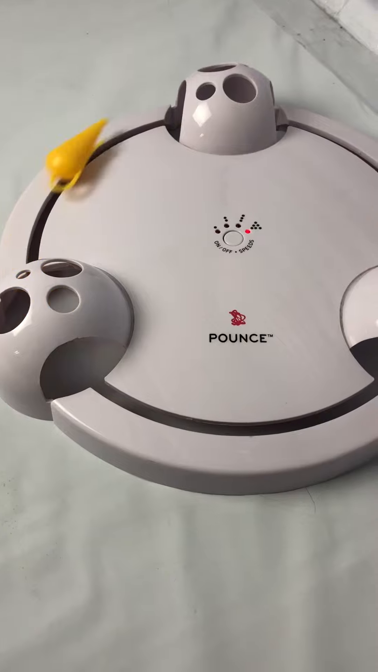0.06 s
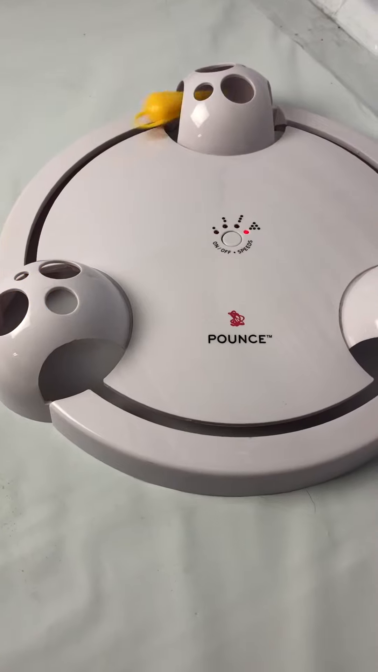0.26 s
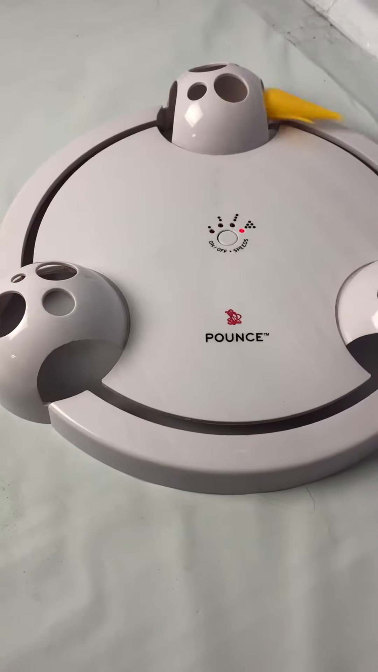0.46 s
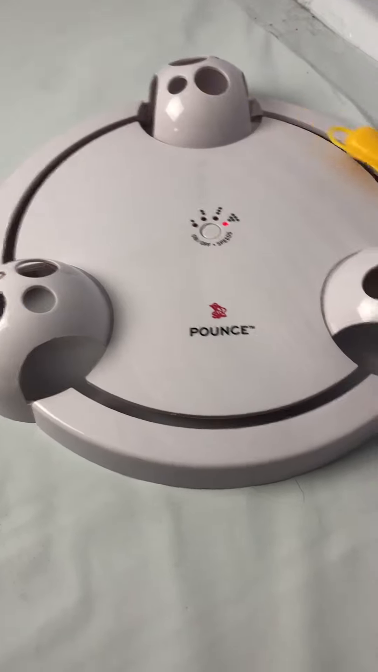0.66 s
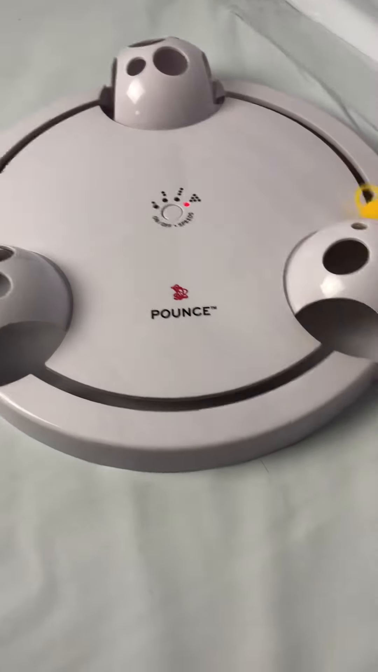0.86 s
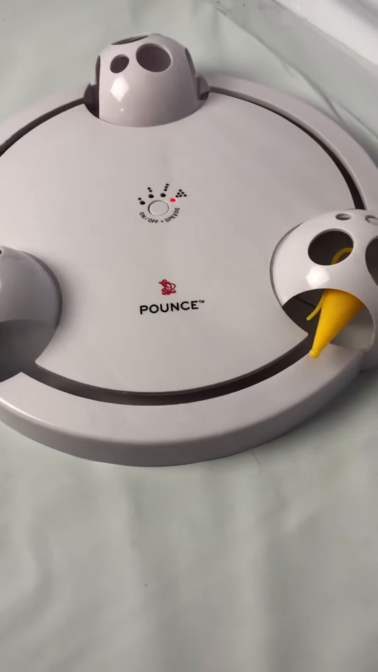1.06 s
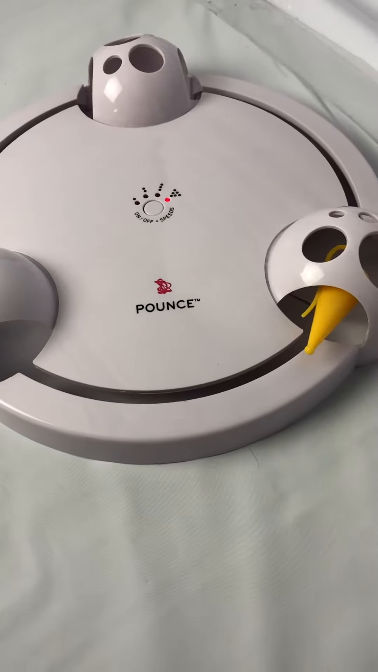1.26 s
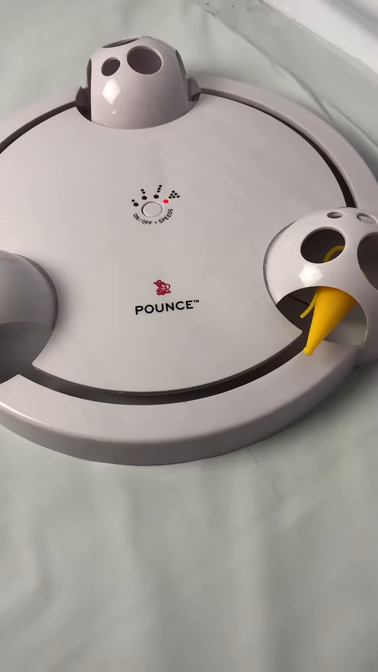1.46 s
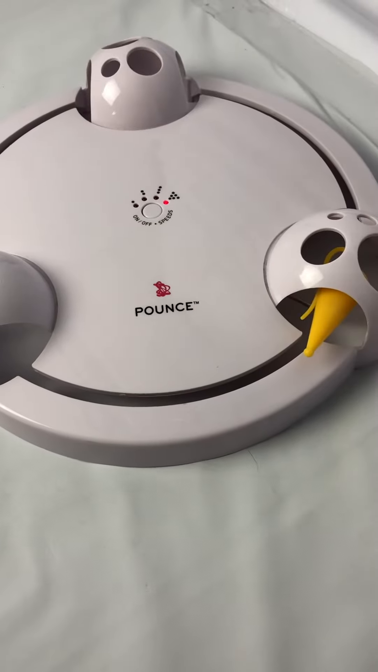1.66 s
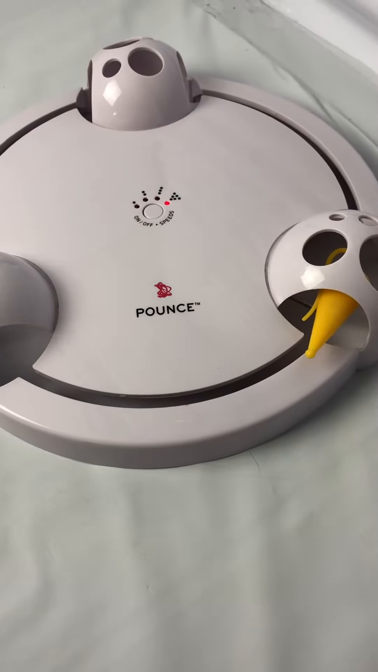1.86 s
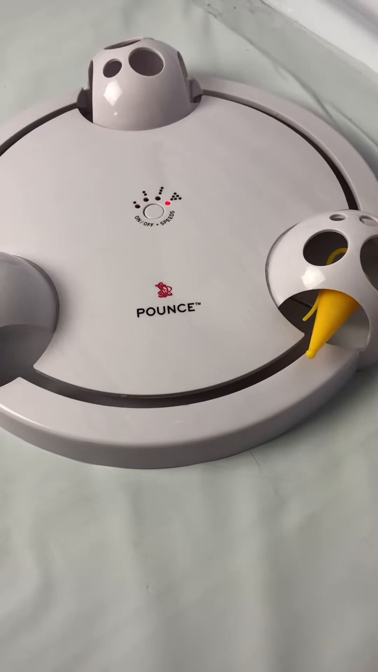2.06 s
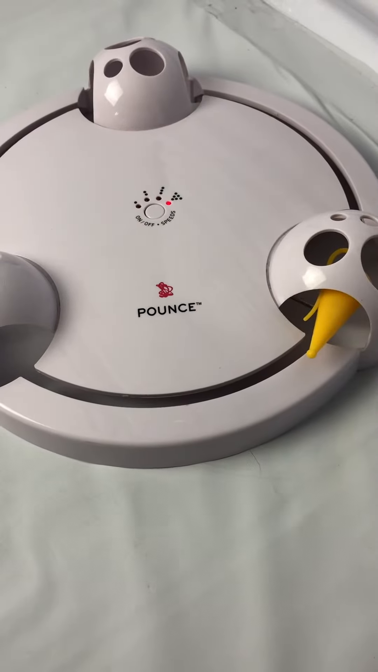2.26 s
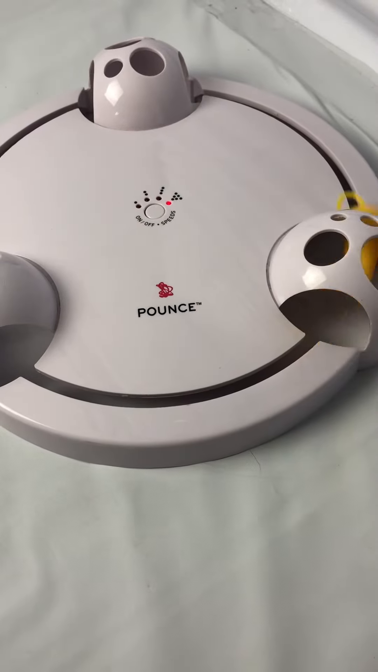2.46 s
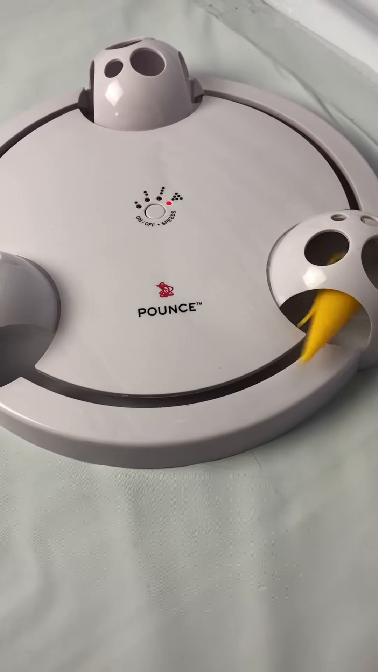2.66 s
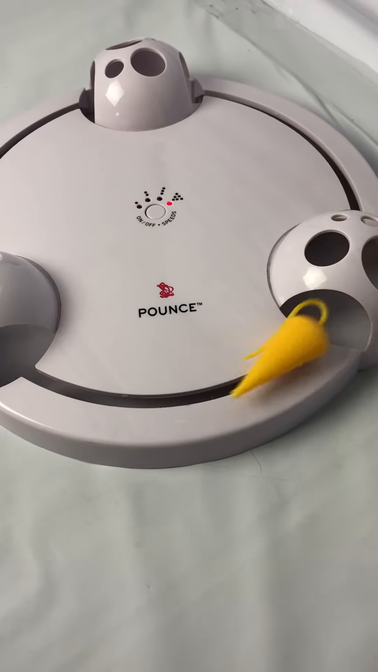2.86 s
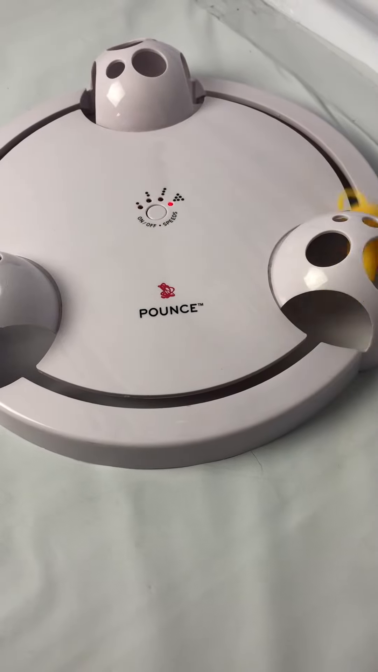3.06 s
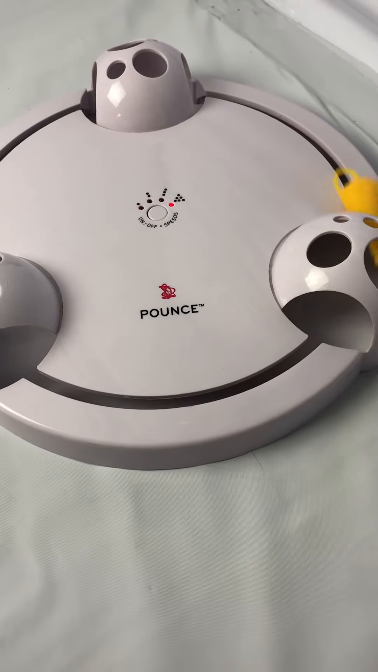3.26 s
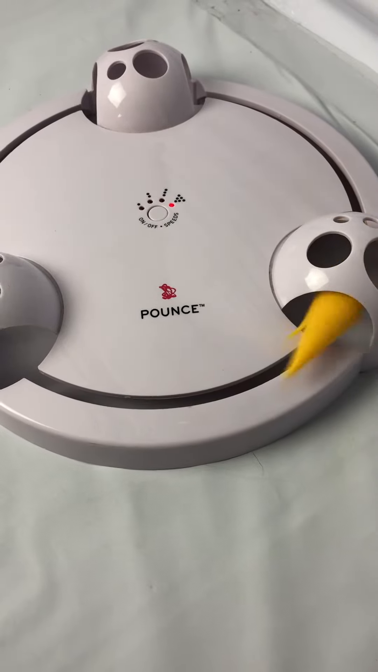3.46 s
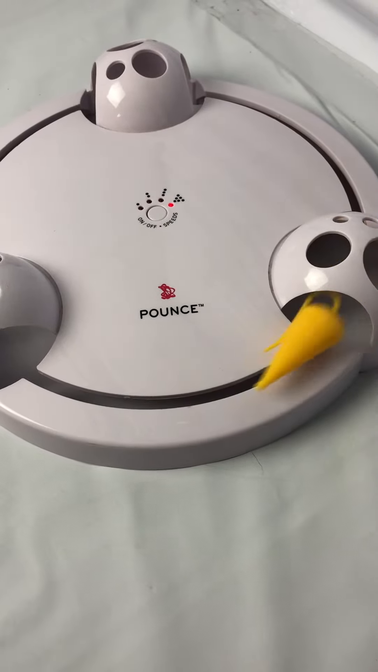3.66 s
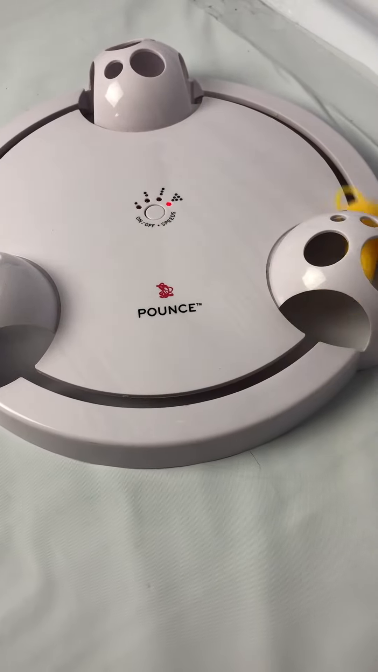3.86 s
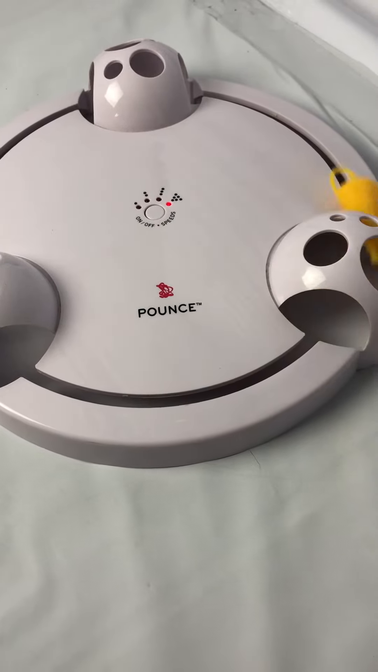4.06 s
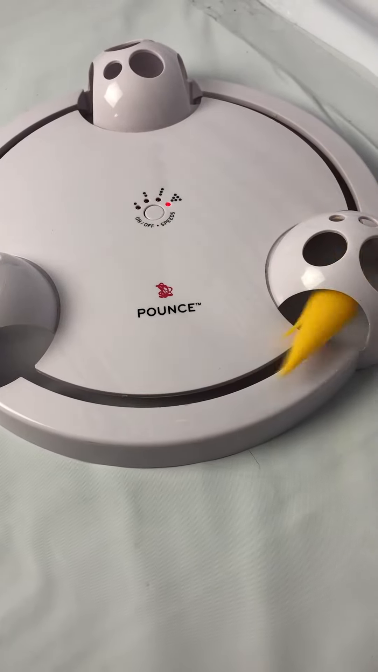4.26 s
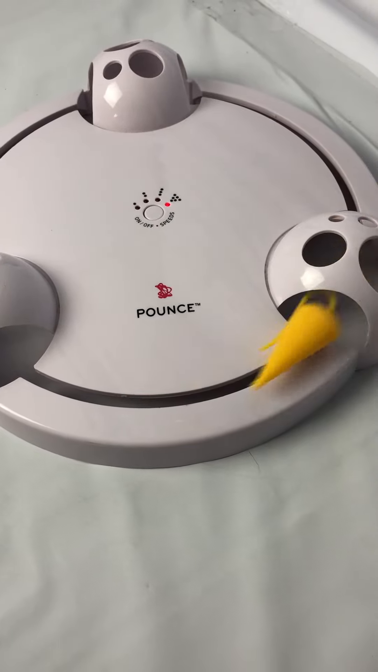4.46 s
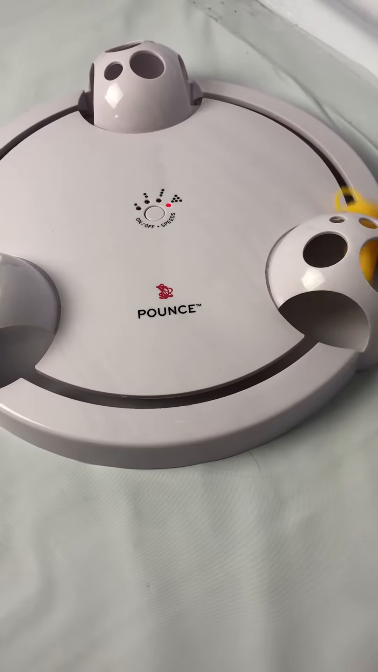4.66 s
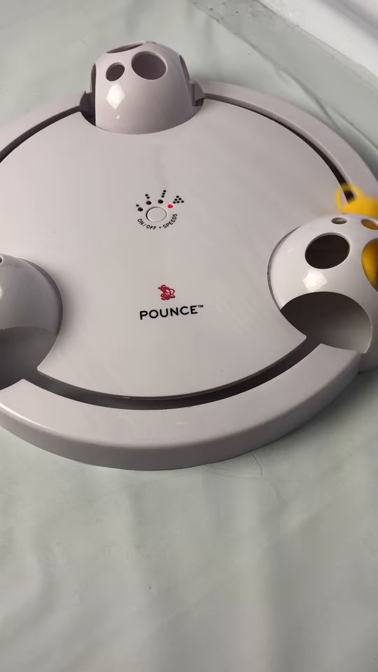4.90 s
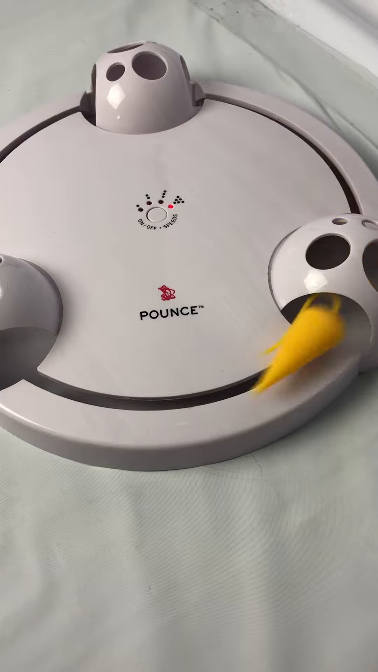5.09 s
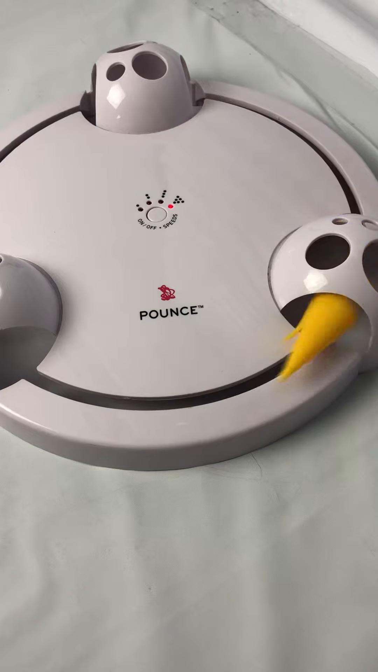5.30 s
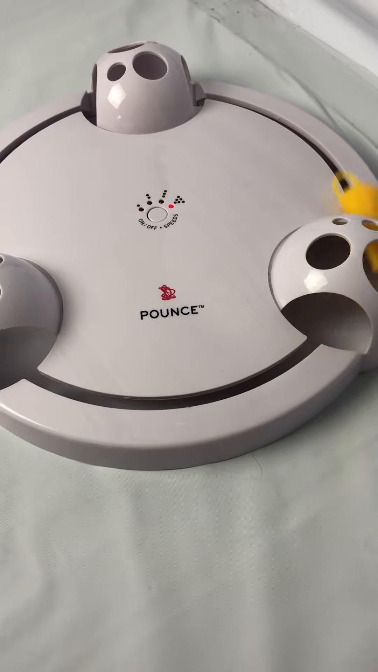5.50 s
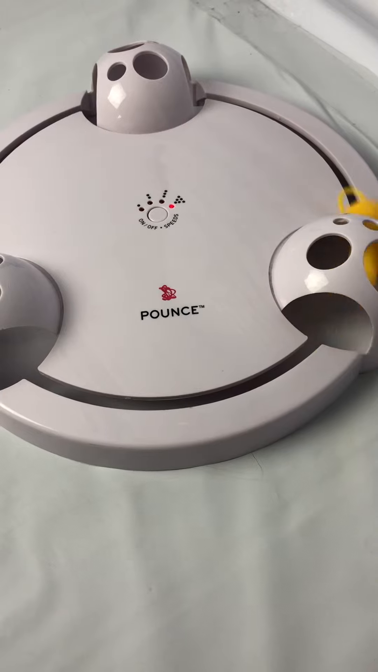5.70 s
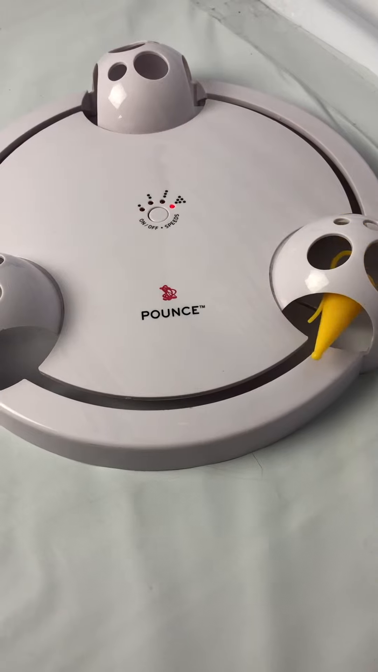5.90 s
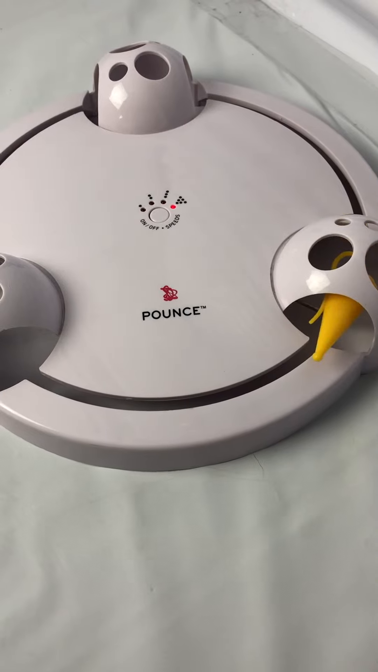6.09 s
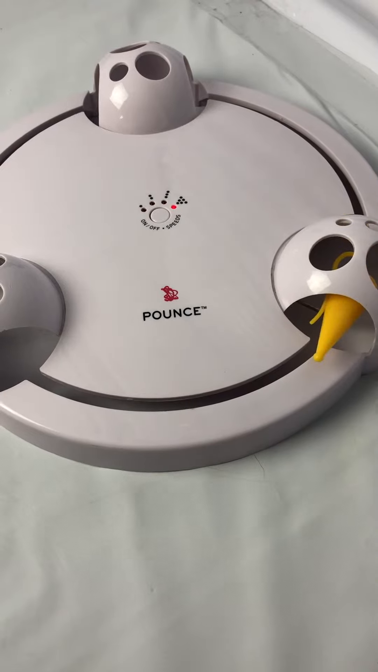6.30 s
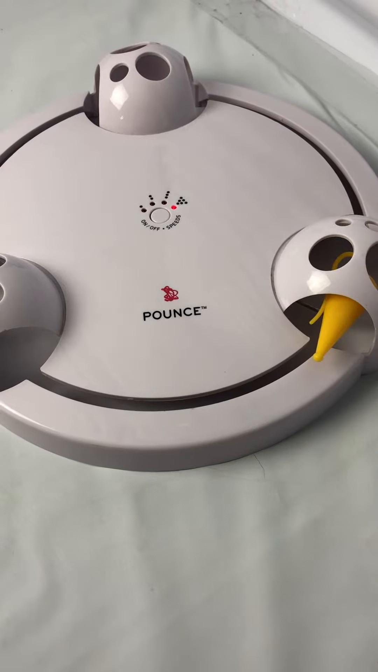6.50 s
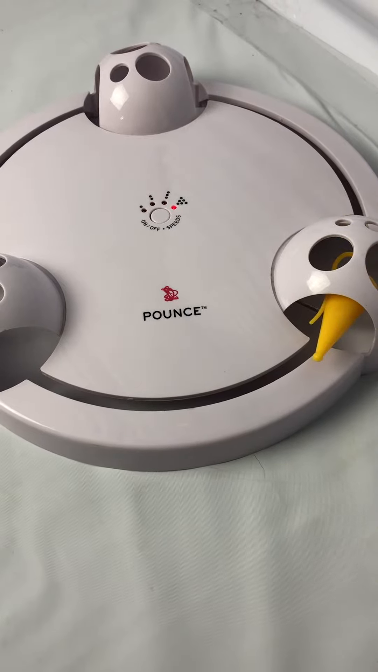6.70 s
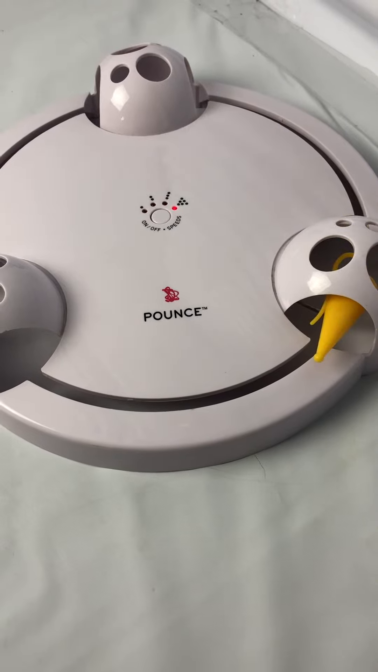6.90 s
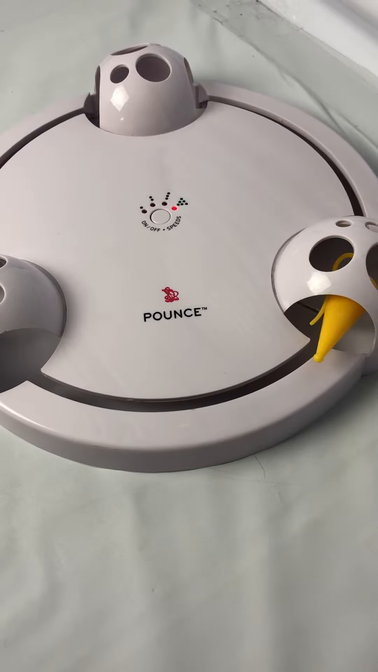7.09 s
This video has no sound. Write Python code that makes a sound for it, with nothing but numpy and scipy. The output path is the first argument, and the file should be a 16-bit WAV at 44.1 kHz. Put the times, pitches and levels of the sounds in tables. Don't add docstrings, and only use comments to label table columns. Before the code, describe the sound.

Close up in a small quiet room, a motorised cat toy whirs as its carriage rubs along a hollow plastic slot. One sweep lasts about a second, with a rattly bump midway, and stops with a clack. After a pause of just over a second it swings to and fro, knocking and rebounding at every reversal, then stops abruptly, leaving faint hum and hiss.

```python
import sys
import numpy as np
from scipy import signal
from scipy.fft import rfft, irfft, next_fast_len
from scipy.io import wavfile

SR = 44100
rng = np.random.default_rng(int(sys.argv[2]) if len(sys.argv) > 2 else 0)


def boost(x):
    u = np.asarray(x, float) / 20
    return 10 ** u


def output_pcm(signal):
    pcm = np.clip(np.atleast_2d(signal).T, -1, 1) * 32767
    wavfile.write(sys.argv[1], SR, np.round(pcm).astype(np.int16))


N = 314918

# switch-on in seconds, switch-off in seconds.
MOTOR_RUNS = [
    (-0.2, 1.096),
    (2.377, 5.9),
]
# time after the turn in seconds, level in dB.
SWING_LOAD = [
    [(0, 5), (0.12, 1), (0.25, 0), (0.4, 1)],
    [(0, 2.5), (0.13, 4), (0.23, -3.5), (0.4, 0)],
]
# stop in seconds, peak level in dB,
# rebound delay in seconds, rebound level in dB, lead of the brake tick in seconds.
TURNS = [(1.0653, -26.5, 0.02, -26.5, .0507), (2.4906, -27.5, .0249, -28.5, 0.049),
         (2.7082, -24, 0.028, -24, 0.052), (3.0966, -26.5, 0.024, -29.5, 0.055),
         (3.488, -26.5, 0.03, -22.5, .0467), (3.8885, -24, 0.023, -28, 0.048),
         (4.2904, -27, 0.023, -24, 0.05), (4.69, -25.5, .0228, -28.5, 0.041),
         (5.0878, -24.5, 0.025, -28, 0.043), (5.4869, -26, 0.024, -27, 0.038),
         (5.8826, -26.5, 0.025, -27, .0509)]
# frequency in Hz, width in Hz, level in dB.
RUBBED_SHELL = [(516, 85, -12.5), (647.7, 91, -4), (705.3, 53.3, 1), (850, 117, -7.5), (948, 58, -1),
                (1038, 58, -0.5), (1175, 180, -7), (1364, 217, -7), (1500, 114, -4.5), (1726, 223, -7),
                (1793, 680, -13), (2340, 85, -15.5)]
# frequency in Hz, width in Hz, level in dB.
MOTOR_PARTS = [(6070, 120, -7), (6320, 180, 1.5), (6850, 160, 0.5), (7400, 220, -3.5), (8280, 180, -4),
               (10260, 130, -12), (11500, 200, -12), (12340, 430, -15.5), (14500, 2600, -20.5)]
# frequency in Hz, width in Hz, level in dB.
BASE = [(60, 38, -9.5), (118.3, 10.5, -0.5), (158.9, 15, 0.5), (222.7, 17.4, -4.5), (282, 30.5, -3.5)]
# frequency in Hz, width in Hz, level in dB.
LOOSE_PARTS = [(2600, 400, -4), (2870, 120, -0.5), (3213, 150, 1.5), (3500, 130, -4.5), (3960, 160, -3.5),
               (4620, 220, -6.5), (5100, 420, -7)]
# frequency in Hz, level in dB.
HISS_COLOUR = [(20, -20), (45, -5), (110, -2), (250, -6), (500, -12.5), (1000, -18.5), (2000, -24.5),
               (5000, -27.5), (10000, -30), (16000, -36)]
# frequency in Hz, rms level in dB.
HUM = [(60, -82.5), (120, -73.5), (178, -118), (1081, -100), (1801, -93)]
# frequency in Hz, width in Hz, level in dB.
STRUCK_SHELL = [(530, 24, -8.5), (638, 52, -6.5), (719.7, 33.7, -1), (881, 120, -6.5), (1016, 64, 1),
                (1100, 87, -1.5), (1210, 212, 0), (1373, 183, -0.5), (1480, 121, -1), (1674, 149, 0.5),
                (1740, 245, -5), (2266, 180, -10.5)]
# frequency in Hz, width in Hz, level in dB.
LURE = [(2824, 190, 1.5), (3300, 90, 1.5), (3590, 160, -0.5), (4000, 122, 2), (4360, 190, -2),
        (4770, 96, 3), (5180, 250, -1.5), (5915, 370, -1.5), (6580, 540, -5), (7670, 590, -5),
        (8530, 770, -9), (10460, 1100, -15), (12210, 910, -15), (14850, 1700, -20)]
# start in seconds, bright level in dB, shell level in dB, chatter in seconds.
SLACK_KNOCKS = [(.0134, -39.5, -39, 0.01), (0.0874, -46, -35.5, 0.0082), (0.2768, -40, -34.5, .006),
                (.287, -38.5, -36, 0.0059), (0.369, -38.5, -36.5, 0.0053), (0.379, -37.5, -35.5, 0.0049),
                (.416, -33.5, -51, 0.0099), (.4277, -35.5, -36.5, .007), (.445, -38, -39, 0.016),
                (.4762, -27, -30, .018), (0.5225, -31, -30, 0.0086), (.7751, -46, -41, 0.0069),
                (1.046, -35, -31.5, 0.015), (1.0974, -33.5, -33.5, 0.01), (1.1332, -43.5, -36.5, 0.011),
                (1.1868, -55, -43, 0.0046), (2.3847, -47, -60, 0.022), (2.4559, -35.5, -33.5, 0.024),
                (5.8925, -26.5, -42, 0.014), (5.9541, -38, -33, 0.0066), (6.0096, -55, -44, 0.0069),
                (2.659, -42, -34.5, 0.02), (2.6927, -33.5, -31.5, 0.0095), (2.784, -40, -34, 0.0055),
                (2.836, -30.5, -31.5, 0.0068), (2.8913, -42, -41, .007), (2.9487, -40, -39.5, 0.032),
                (3.0606, -36, -41, 0.013), (3.1852, -42.5, -34.5, .007), (3.2307, -37, -40, .004),
                (3.3003, -32.5, -33.5, 0.0091), (3.343, -42, -37.5, 0.0099), (3.5072, -29.5, -32.5, 0.012),
                (3.5317, -40, -41, 0.011), (3.5568, -47, -40, 0.0054), (3.5776, -45, -43, .012),
                (3.8423, -35.5, -48, 0.027), (3.9366, -33, -33, 0.0048), (3.9647, -36, -35, 0.0098),
                (4.0676, -33, -32, 0.0094), (4.2752, -38, -36, 0.014), (4.369, -44, -35.5, 0.013),
                (4.501, -36, -34.5, 0.028), (4.867, -29.5, -32.5, 0.0088), (4.9018, -42, -41, 0.0042),
                (5.1694, -38, -34.5, 0.0051), (5.4004, -40.5, -37.5, 0.01), (5.6288, -37.5, -32, 0.0086),
                (5.663, -32, -30, 0.025), (5.7663, -41, -38, .013), (5.7773, -45, -38, 0.0087)]
# start in seconds, level in dB, favoured
# pitch in Hz.
LURE_TICKS = [(.0998, -42, 2870), (2.543, -32.5, 2900), (2.593, -31.5, 2720), (2.628, -40.5, 2840),
              (3.0126, -41.5, 3590), (3.054, -48, 5090), (3.267, -46, 3330), (3.3937, -37.5, 2850),
              (3.694, -38, 2890), (3.7637, -43, 5430), (3.7763, -43, 2860), (3.8214, -44, 2930),
              (4.103, -39.5, 2890), (4.132, -43, 2640), (4.169, -38, 2710), (4.31, -27.5, 4500),
              (4.4186, -36, 3300), (4.563, -48, 5360), (4.767, -39, 3210), (4.837, -50, 3060),
              (4.934, -39, 2830), (5.1295, -35.5, 4770), (5.2742, -41, 2500), (5.293, -43, 2860),
              (5.361, -44, 5330), (5.3762, -42, 2850), (5.5633, -36.5, 3300), (5.731, -48, 3190)]
# start in seconds, peak level in dB, favoured pitch in Hz, chatter in seconds.
SHELL_BUMPS = [(.015, -20.5, 1010, 0.0065), (.162, -23.5, 990, 0.007), (.279, -20, 950, 0.024),
               (.467, -12, 1430, 0.0079), (.491, -12, 960, 0.014), (.504, -17.5, 1500, 0.0061),
               (1.159, -42, 646, .008), (1.19, -41, 1000, .015), (2.387, -19.5, 640, .006),
               (2.545, -17, 1480, 0.012), (2.564, -22, 1460, 0.015), (2.823, -21, 1600, 0.0092),
               (3.06, -19, 1250, 0.0085), (3.855, -22, 1100, 0.03), (4.007, -17, 1630, 0.0075),
               (4.062, -34, 1330, 0.013), (4.4772, -18, 1020, 0.0052), (4.3182, -12, 1220, 0.0031),
               (4.505, -31, 1210, .01), (4.803, -23.5, 1090, 0.0081), (5.061, -30, 1160, .008),
               (5.2, -17, 980, 0.012), (5.254, -25, 988, .006), (5.453, -15, 785, 0.016),
               (5.544, -31, 686, .011), (5.662, -33, 1330, .006), (5.892, -10.5, 1140, 0.009),
               (6.045, -43, 1006, 0.013)]


def rms_one(x):
    return x / np.sqrt(np.mean(x ** 2) + 1e-20)


def drift(rate_hz):
    r = np.exp(-80 * np.pi * rate_hz / SR)
    steps = rng.standard_normal(N // 40 + 2002)
    slow = signal.lfilter([1], [1, -2 * r, r * r], steps)[2000:]
    return np.interp(np.arange(N) / 40, np.arange(len(slow)), rms_one(slow))


def resonate(x, hz, width_hz):
    r = np.exp(-np.pi * width_hz / SR)
    feed = np.array([1, 0, -1]) * (1 - r * r) / 2
    return signal.lfilter(feed, [1, -2 * r * np.cos(2 * np.pi * hz / SR), r * r], x + 1e-18)


def grains(shape, per_s, spread_db):
    sizes = boost(spread_db * np.minimum(rng.exponential(1, shape), 4)) * rng.choice([-1, 1], shape)
    return sizes * (rng.random(shape) < per_s / SR)


def rub(modes, level_db, per_s, spread_db, lumpy_db):
    wander_db = 1.0
    drag = grains(N, per_s, spread_db) * boost(lumpy_db * drift(40))
    body = np.zeros(N)
    for k, (hz, width_hz, db) in enumerate(modes):
        gain = boost(db + wander_db * drift(7.3))
        body += (-1) ** k * gain * resonate(drag, hz, width_hz)
    return boost(level_db) * rms_one(body)


def motor_run(coast_db_per_s):
    spin_up_s, spin_up_db = 0.094, -13
    t = np.arange(N) / SR
    runs = []
    for on, off in MOTOR_RUNS:
        spin_up = spin_up_db * np.clip(1 - (t - on) / spin_up_s, 0, 1)
        coast = coast_db_per_s * np.maximum(t - off, 0)
        runs.append(np.where(t < on, -150, spin_up + coast))
    return np.maximum(*runs)


def swing():
    t, turn_s = np.arange(N) / SR, np.array(TURNS)[:, 0]
    last = np.searchsorted(turn_s, t) - 1
    since = t - turn_s[last]
    sweeping = last < 1
    load = np.where(last % 2, *[np.interp(since, *np.transpose(rows)) for rows in SWING_LOAD])
    speed = np.interp(since, [0, 0.12, 0.62], [8.5, -5, 8.5])
    pass_s, pass_width_s, pass_db = 0.46, 0.11, 6
    hood = pass_db * np.exp(-((t - pass_s) / pass_width_s) ** 2)
    return np.where(sweeping, hood, load), np.where(sweeping, 0, speed)


def whirr():
    load, speed = swing()
    shell_db = -49.5 + motor_run(-190) + load
    parts_db = -68.5 + motor_run(-300) + speed
    base_db = -57.5 + motor_run(-85) + 0.53 * load
    rattle_db = shell_db - 13.5 + 3 * (np.arange(N) > TURNS[1][0] * SR)
    shell = rub(RUBBED_SHELL, shell_db + 3.0, per_s=2500, spread_db=2.0, lumpy_db=0.07)
    parts = rub(MOTOR_PARTS, parts_db + 2.5, per_s=7200, spread_db=1.0, lumpy_db=-2.8)
    base = rub(BASE, base_db - 0.5, per_s=600, spread_db=6.0, lumpy_db=-1.0)
    rattle = rub(LOOSE_PARTS, rattle_db, per_s=900, spread_db=3.5, lumpy_db=2.5)
    return shell + parts + base + rattle


def room():
    size = next_fast_len(N)
    hz = np.maximum(np.arange(size // 2 + 1) * SR / size, 1)
    colour_hz, colour_db = np.transpose(HISS_COLOUR)
    colour = boost(np.interp(np.log(hz), np.log(colour_hz), colour_db))
    hiss = irfft(rfft(rng.standard_normal(size)) * colour, size)[:N]
    t = np.arange(N) / SR
    hum = np.zeros(N)
    for f, db in HUM:
        hum += boost(db + 1.5 * drift(3)) * np.sqrt(2) * np.sin(2 * np.pi * f * t)
    whine_hz, whine_width_hz = 8620, 260
    whine = resonate(rng.standard_normal(N), whine_hz, whine_width_hz)
    whine = resonate(whine, whine_hz, whine_width_hz)
    return boost(-68.5) * rms_one(hiss) + hum + boost(-89.5) * rms_one(whine)


def walls(x):
    t60_s, level_db = 0.12, -16.5
    age = np.arange(SR // 3) / SR
    tail = rng.standard_normal(len(age)) * boost(-60 * age / t60_s) * (age > .004)
    tail = signal.lfilter([1], [1, -.5], tail)
    return boost(level_db) * signal.fftconvolve(x, tail / np.sqrt(np.sum(tail ** 2)))[:N]


def strike(modes, at_s, level_db, chatter_s, first, favoured_hz=None, focus_db=None, per_s=1400):
    age = np.arange(2048)
    chatter = grains((len(at_s), len(age)), per_s, 3.86) * .5
    chatter[:, 0] = first * np.minimum(0.01 / chatter_s, 1)
    chatter *= np.exp(-age / (np.clip(chatter_s, .001, .02)[:, None] * SR))
    chatter *= (boost(level_db) / np.sqrt(np.sum(chatter ** 2, axis=1)))[:, None]
    where = (np.round(at_s * SR).astype(int)[:, None] + age).ravel()
    scatter_db = 3.0
    share = boost(scatter_db * np.clip(rng.standard_normal((len(at_s), len(modes))), -1.5, 1.5))
    if favoured_hz is not None:
        octaves_off = np.abs(np.log2(np.array(modes)[:, 0] / favoured_hz[:, None]))
        share *= boost(-focus_db[:, None] * octaves_off)
    out = np.zeros(N)
    for k, (hz, width_hz, db) in enumerate(modes):
        force = np.bincount(where, (chatter * share[:, k:k + 1]).ravel(), N)
        out += (-1) ** k * boost(db) * resonate(force, hz, width_hz)
    return out


def contacts():
    crisp_s = .008
    rows = [(s, bright, shell, 3250, chatter) for s, bright, shell, chatter in SLACK_KNOCKS]
    rows += [(s, db, db - 9, hz, 0.0094) for s, db, hz in LURE_TICKS]
    for k, (s, db, gap, rebound_db, lead) in enumerate(TURNS):
        inward = k % 2
        brake = (-34.5, -46.5, 1600) if inward else (-31, -55, 3100)
        rows.append((s - lead, *brake, crisp_s))
        rows.append((s, db, db + 3.5, 3100, 0.011))
        rows.append((s + gap, rebound_db, rebound_db, 3500, .0095))
    rows += [(s + .12, -37.5, -31, 3000, 0.2) for s, *_ in TURNS[2:-1]]
    rows += [(s + .144, -28.5, -29, 3400, crisp_s) for s, *_ in TURNS[2:-1:2]]
    return rows


def knocks():
    at_s, bright_db, shell_db, tick_hz, chatter_s = np.transpose(contacts())
    lure_focus_db = np.clip(-.3 * (bright_db + 19.5), 1, 12)
    shell_focus_db = np.clip(-.6 * (shell_db + 33), 0, 15)
    soft_hz = np.full(len(at_s), 720.0)
    lure = strike(LURE, at_s, bright_db + 24.5, chatter_s, first=0.78,
                  favoured_hz=tick_hz, focus_db=lure_focus_db, per_s=3500)
    shell = strike(STRUCK_SHELL, at_s, shell_db + 36, 1.4 * chatter_s, first=2.1,
                   favoured_hz=soft_hz, focus_db=shell_focus_db)
    base = strike(BASE, at_s, 0.74 * shell_db + 23.5, 1.44 * chatter_s, first=1.8)
    return lure + shell + base


def bumps():
    at_s, peak_db, hz, chatter_s = np.transpose(SHELL_BUMPS)
    return strike(STRUCK_SHELL, at_s, peak_db + 26.5, chatter_s, first=1.7,
                  favoured_hz=hz, focus_db=np.full(len(at_s), 13.5))


def scene():
    toy = whirr() + knocks() + bumps()
    return (toy + walls(toy) + room())[None, :]


def low_pass(x):
    return signal.sosfilt(signal.butter(12, 16450, fs=SR, output="sos"), x)


def record(dry):
    thin = signal.sosfilt(signal.butter(2, 36, "high", fs=SR, output="sos"), dry)
    mix = signal.sosfilt(signal.ellip(12, .5, 60, 15760, fs=SR, output="sos"), thin)
    return low_pass(mix)


dry = scene()
out = record(dry)
output_pcm(out)
```